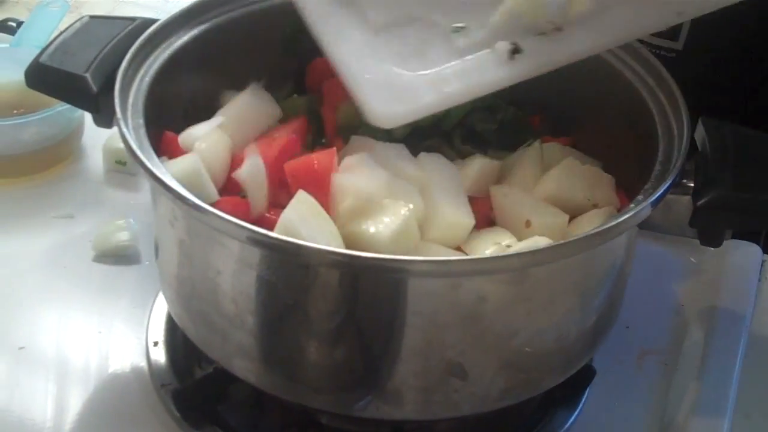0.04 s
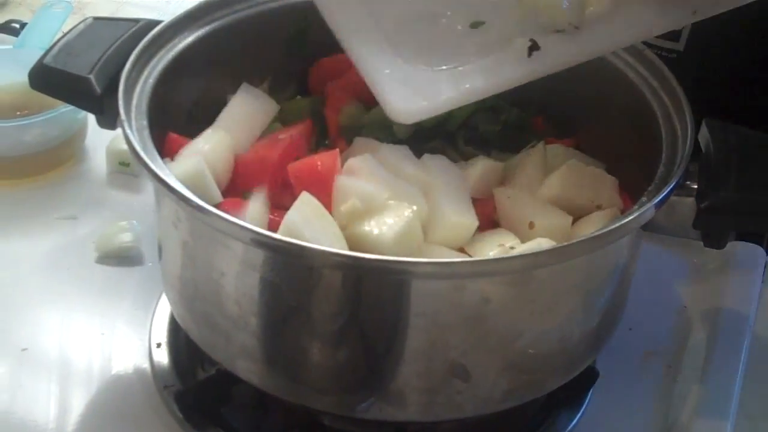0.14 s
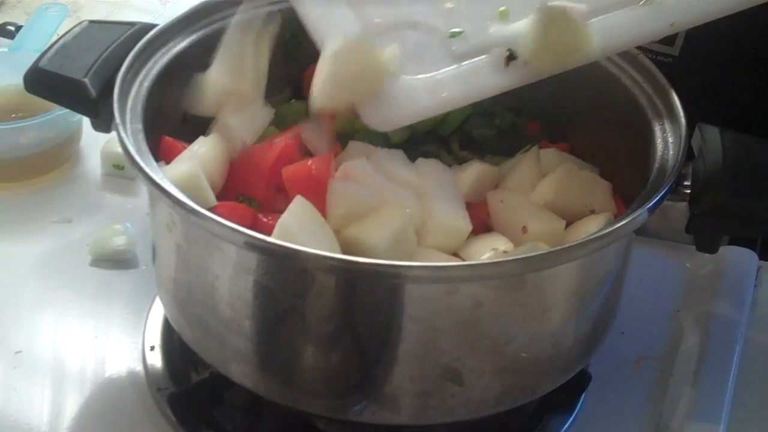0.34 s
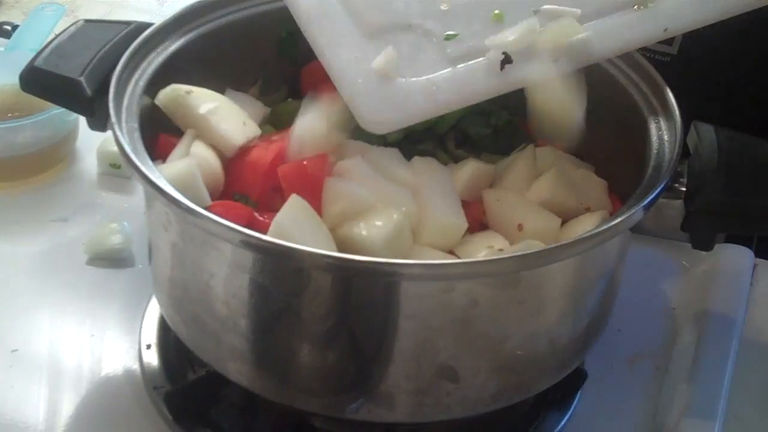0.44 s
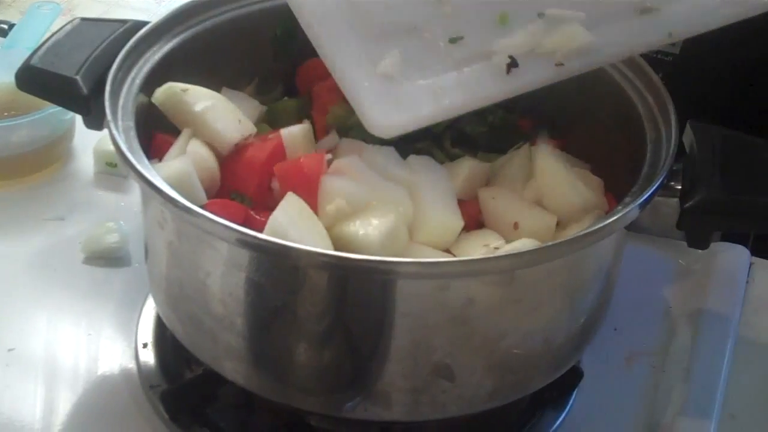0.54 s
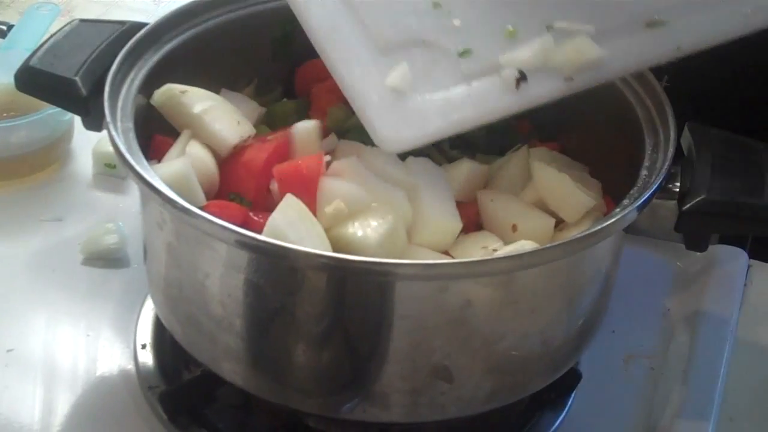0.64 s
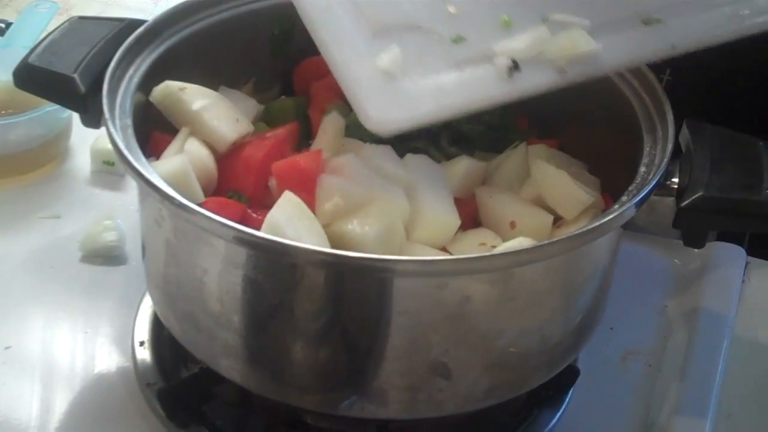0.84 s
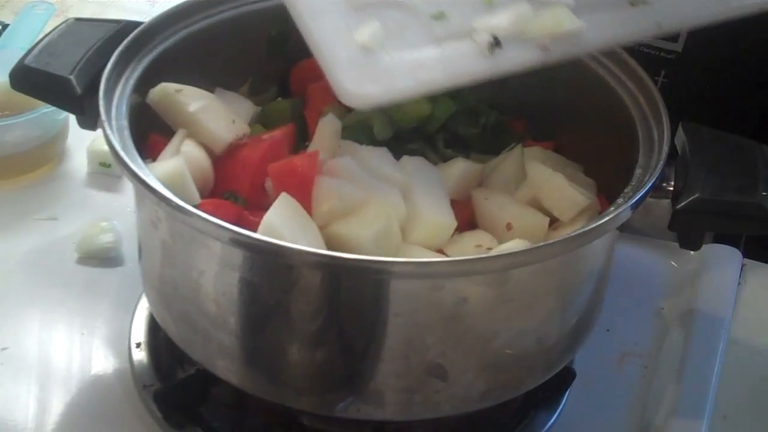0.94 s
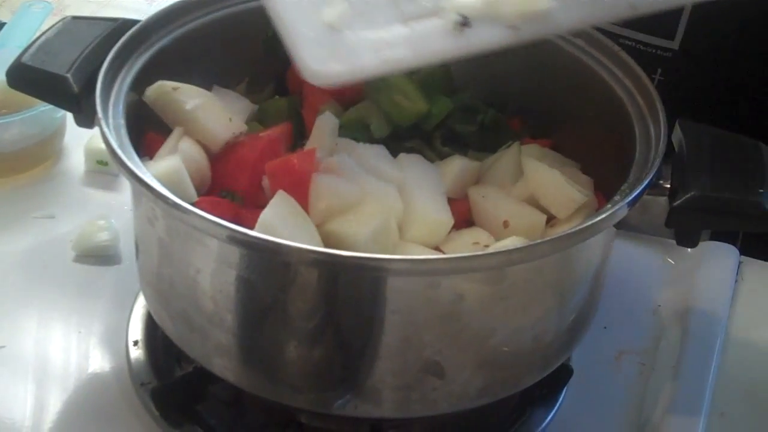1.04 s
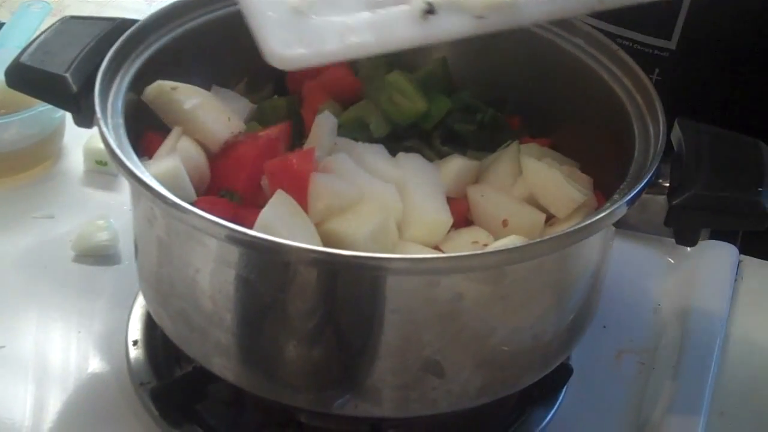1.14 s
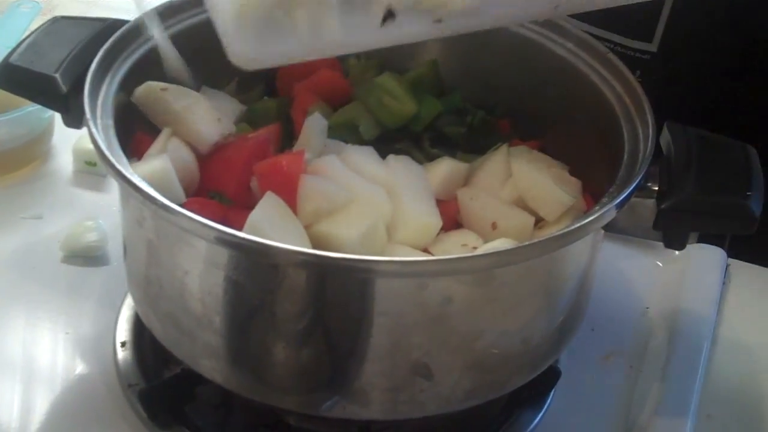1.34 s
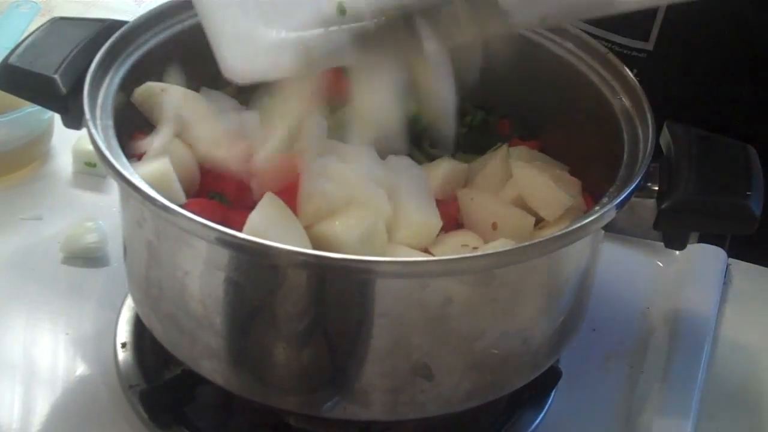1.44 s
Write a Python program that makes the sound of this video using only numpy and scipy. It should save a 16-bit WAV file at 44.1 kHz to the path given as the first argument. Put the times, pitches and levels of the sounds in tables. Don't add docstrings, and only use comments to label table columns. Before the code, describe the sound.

Two knocks of a steel knife on a plastic cutting board, heard close in a small, dull kitchen. Faint pot sizzle and light ticks come first; at 0.24 s a loud snap and clack with thin blade ring, chattering until about 0.35. Near quiet follows. At 0.91 a second, drier knock leads into a gritty, softly ringing metal scrape from 0.97, with small catches, fading by 1.5.

```python
import sys
import numpy as np
from scipy import signal
from scipy.io import wavfile
from scipy.ndimage import uniform_filter1d

SR = 44100
rng = np.random.default_rng(int(sys.argv[2]) if len(sys.argv) > 2 else 0)


def invert_db(x):
    u = np.asarray(x, float) / 20
    return 10 ** u


def master_out(mix):
    frames = np.transpose(np.atleast_2d(mix))
    ceiling = np.clip(frames, -1, 1)
    pcm = np.round(ceiling * 32767).astype(np.int16)
    wavfile.write(sys.argv[1], SR, pcm)


N = 66150

# f/Hz, density/dB per Hz
SIZZLE_COLOUR = [(59, -11), (100, -15.5), (491, -13.5), (545, -1), (698, -18), (1060, -3), (1150, -11.5),
                 (3090, -2.5), (14000, -28.5)]
# f/Hz, width/Hz, level/dB
POT_AIR = [(515, 72, -12), (1041, 12.6, 3.5), (1544, 216, -0.5), (2290, 38, -21), (2930, 135, -3.5)]
# t/s, level/dB
SIZZLE_LEVEL = [
    [(0.0, -52.5), (0.132, -53.5), (0.14, -53)],
    [(0.47, -57.5), (0.592, -57.5), (0.9, -54)],
]
# t/s, puff/dB, f/Hz, ring/dB, ring t60/s
TICKS = [(.040, -37.5, 673, -48, 0.066), (0.04, -59, 3100, -38.5, 0.0073), (.161, -58, 3604, -48.5, 0.25),
         (0.1616, -40.5, 1060, -63, 0.02), (.162, -46, 2210, -46, .03), (0.1615, -45.5, 7400, -60, .02),
         (.1615, -50, 13300, -57, 0.04), (.163, -62, 10700, -61, .06), (.188, -49, 6000, -60, .02),
         (.188, -62, 13100, -64, 0.092), (.19, -45, 2220, -55, .03), (.219, -70, 10900, -71, 0.035),
         (.188, -57, 10700, -55.5, 0.054), (.243, -17, 1450, -33, 0.05), (0.275, -28, 1350, -50, 0.02),
         (0.2388, -18, 4400, -41, .04), (.276, -53, 10700, -42, 0.073), (.287, -31, 6430, -40, .03),
         (0.289, -36, 1300, -51, .05), (.298, -33, 1943, -37, 0.058), (0.268, -32, 2816, -23, 0.054),
         (.272, -40, 6330, -30.5, 0.084), (.292, -35, 4460, -36.5, 0.25), (.293, -36, 3620, -46, 0.28),
         (0.322, -46, 4680, -37.5, 0.075), (.33, -60, 11840, -52.5, 0.1), (.332, -61, 7290, -50, 0.18),
         (0.459, -46, 5240, -77, 0.024), (0.638, -54.5, 7200, -88, 0.022)]
# t/s, puff/dB, f/Hz, ring/dB, ring t60/s
CATCHES = [(.985, -39, 5000, -50, .03), (.985, -48, 2188, -32.5, .05), (1.033, -55, 2203, -41, 0.046),
           (1.048, -60, 8250, -41, 0.062), (1.05, -45, 4960, -44, .03), (1.05, -60, 2160, -40, 0.062),
           (1.105, -55, 4710, -35, 0.036), (1.112, -60, 8420, -40, 0.054), (1.12, -55, 6250, -40, 0.044),
           (1.158, -53, 2179, -37.5, 0.048), (1.284, -50, 4140, -42.5, 0.045), (1.407, -39, 4460, -54, .03),
           (1.084, -49, 4086, -33, 0.046), (1.092, -60, 2268, -36, 0.055), (1.136, -46, 4620, -40, 0.13),
           (1.246, -60, 8430, -41, 0.089), (1.305, -41, 2204, -35, 0.077), (1.315, -39, 2800, -38, 0.044),
           (1.312, -46, 1246, -45, 0.1), (1.349, -67, 2116, -46, 0.043), (1.387, -69, 1262, -44, 0.057),
           (1.4205, -39, 4720, -35, 0.071), (1.4194, -60, 4460, -38, 0.082),
           (1.4188, -62, 4065, -38.5, 0.072), (1.419, -42, 2600, -48, .02), (1.42, -54, 6640, -39.5, 0.072),
           (1.423, -44, 4600, -62, 0.024), (1.441, -62, 8170, -46, 0.1), (1.42, -46.5, 8320, -40.5, 0.048),
           (1.477, -68, 2270, -72, 0.033), (1.242, -66, 2206, -43, 0.13)]
# t/s, level/dB, f/Hz, length/s
THUDS = [
    (.06, -63.5, 278, 0.06),
    (.145, -59.5, 296, 0.018),
    (.158, -64, 171, 0.021),
]
# t/s, level/dB
SLIDE_LEVEL = [
    (.14, -62.5),
    (.17, -57.5),
    (.23, -60.5),
    (.24, -28),
    (.27, -47),
    (.31, -34.5),
    (.35, -57),
    (.40, -62),
    (.46, -63),
]
# f/Hz, density/dB per Hz
SLIDE_COLOUR = [(100, -115), (330, -59), (550, -4.5), (1250, -4), (2500, -15), (6500, -4.5), (9300, -18.5),
                (14000, -41)]
# f/Hz, t60/s, level/dB
CHATTER = [(1450, 0.054, -6), (1925, 0.055, -4.5), (2820, 0.038, -6), (541, 0.077, -2), (4460, .07, -9),
           (4950, 0.034, -3.5), (5700, 0.036, -7), (6310, 0.044, -15), (6790, 0.057, -6.5),
           (7970, 0.057, -13), (9650, .015, -13), (10700, 0.032, -15), (12100, .02, -12),
           (13100, 0.013, -10)]
# t/s, blade/dB, board/dB, crack/dB, crack t60/s
KNOCKS = [
    (.2358, -20, -21, -14, .045),
    (.9126, -20, -20, -16, .022),
]
# snap/dB, snap f/Hz, push/dB, push length/s
CONTACT = [
    (-3.5, 2260, -36.5, 0.0085),
    (-13, 4930, -40, 0.0019),
]
# f/Hz, density/dB per Hz
CRACK_COLOURS = [
    [(100, -44), (450, -19.5), (1850, -17.5), (2230, -8), (3070, -25.5), (5190, -14.5), (10800, -36),
     (14200, -36.5)],
    [(60, -65), (500, -11), (900, 1), (2000, -9.5), (5000, -16), (9000, -20.5), (16000, -39)],
]
# f/Hz, t60/s, knock 1/dB, knock 2/dB
BOARD = [(150, .05, -14, -44), (600, .1, -6, -14), (850, .03, -9, -4), (1040, .03, -10, -14),
         (1440, .035, -14, -14), (1600, .06, -14, -7), (1925, .04, -12, -18), (2306, .03, -3, -12),
         (5190, .035, 2, -3), (7850, .04, -8, -24), (9950, .03, -24, -30), (11880, .05, -16, -44),
         (13100, .05, -12, -44)]
# f/Hz, t60/s, knock 1/dB, knock 2/dB
BLADE = [(538, .3, -22, -18), (1256, .27, -6, -1), (2178, .12, 0, 0), (2810, .15, -2, -15),
         (3620, .33, -15, -17.5), (4083, .09, 1, -18), (4460, .19, -5, -8), (4713, .22, -11, -11),
         (6305, .2, -13, -27), (6715, .2, -30, -28), (7290, .13, -18, -7), (8315, .14, -7, -26),
         (10700, .09, -7, -42), (11330, .06, -40, -13)]
# t/s, level/dB
SCRAPE_LEVEL = [
    (.93, -66),
    (.975, -46),
    (.99, -44.5),
    (1.1, -41),
    (1.19, -49),
    (1.26, -47.5),
    (1.33, -42),
    (1.40, -52),
    (1.5, -54),
]
# f/Hz, density/dB per Hz
SCRAPE_COLOUR = [(100, -50), (330, -9.5), (570, 1), (2200, -14), (5000, 0), (8500, -3), (11000, -7),
                 (14000, -8.5)]
# f/Hz, t60/s, level/dB
SING = [(1252, .1, -11), (2150, .05, -6), (2205, .04, -5), (2300, .035, -7), (2820, .05, -9),
        (4075, .045, -4), (4455, .08, -9), (4700, .04, -5), (6280, .045, -9), (6690, .045, -10),
        (7300, .07, -12), (7840, .06, -12), (8300, .03, -6), (9960, .05, -17),
        (5500, .012, -10), (8900, .012, -13), (9500, .015, -16), (10500, .015, -15), (11800, .012, -15),
        (13250, .012, -15)]
# t/s, offset/thousandths of full scale
SAG = [
    (.234, -.2),
    (.25, -6),
    (.32, -2.6),
    (.4, -1.4),
    (.61, -.7),
    (.77, 2.1),
    (.91, .2),
    (.93, -1.1),
    (1.27, -.3),
]

RUMBLE_DB, RUMBLE_HZ = -75.5, 25
PUFF_T60_S, PUFF_SKIRT_DB = .012, -26
RISE_S, LOW_CUT_HZ = .0015, 30
SING_DB, HISS_DB, WAVER_DB = -2.5, -4.5, 3.5
ROOM_T60_S, ROOM_DB, ROOM_HZ = 0.27, -12.5, 5350
BAND_HZ, LEAK_GAIN = 13850, .07


def evened(x):
    return x / np.sqrt(np.mean(x ** 2) + 1e-20)


def add(mix, start_s, sound):
    part = mix[round(start_s * SR):][:len(sound)]
    part += sound[:len(part)]


def colour(x, points):
    hz, db = np.transpose(points)
    f = abs(np.fft.fftfreq(4096, 1 / SR))
    log_gain = np.interp(np.log(f + 1), np.log(hz + 1), db) * np.log(10) / 20
    spectrum = np.exp(np.conj(signal.hilbert(log_gain)))
    taps = np.fft.ifft(spectrum).real[:2048]
    return signal.oaconvolve(x, taps / np.linalg.norm(taps))[:len(x)]


def level(points):
    return invert_db(np.interp(np.arange(N) / SR, *np.transpose(points)))


def wander(db, size):
    return invert_db(db * evened(uniform_filter1d(rng.standard_normal(N), size)))


def slips(per_s, spread_db):
    size = invert_db(spread_db * np.minimum(rng.exponential(1, N), 4))
    happens = rng.random(N) < per_s / SR
    return evened(size * rng.standard_normal(N) * happens)


def ring(modes, column):
    t = np.arange(SR // 2) / SR
    m = np.array(modes).T[:, :, None]
    decay = invert_db(m[column] - 60 * t / m[1])
    partials = decay * np.sin(2 * np.pi * m[0] * t)
    return partials.sum(0) * np.minimum(t / RISE_S, 1)


def rung(drive, modes):
    out = np.zeros(N)
    for mode in modes:
        gripped = drive * wander(WAVER_DB, size=900)
        out += signal.oaconvolve(gripped, ring([mode], column=2))[:N]
    return out / np.linalg.norm(ring(modes, column=2))


def sizzle():
    fizz = colour(.9 * rng.standard_normal(N) + .35 * slips(2500, 3.0), SIZZLE_COLOUR)
    t = np.arange(2000) / SR
    air = np.zeros(len(t))
    for hz, width_hz, db in POT_AIR:
        air += invert_db(db) * width_hz * np.exp(-np.pi * width_hz * t) * np.cos(2 * np.pi * hz * t)
    fizz = fizz + invert_db(-2.5) * evened(signal.oaconvolve(rng.standard_normal(N), air)[:N])
    swell = wander(1.0, size=3000)
    rumble = signal.lfilter(*signal.butter(2, RUMBLE_HZ, fs=SR), rng.standard_normal(N))
    lumps = wander(1.3, size=5000)
    points = [row for part in SIZZLE_LEVEL for row in part]
    return evened(fizz) * level(points) * swell + invert_db(RUMBLE_DB) * evened(rumble) * lumps


def ticks():
    out, t = np.zeros(N), np.arange(12000) / SR
    for s, puff_db, hz, ring_db, ring_t60_s in TICKS + CATCHES:
        puff = rng.standard_normal(len(t)) * invert_db(puff_db - 60 * t / PUFF_T60_S)
        skirt = [(hz / 9, 2 * PUFF_SKIRT_DB), (hz / 3, PUFF_SKIRT_DB), (hz / 1.5, -5),
                 (hz, 0), (hz * 1.4, -5), (hz * 2.5, PUFF_SKIRT_DB)]
        add(out, s, colour(puff, skirt))
        decay = invert_db(ring_db - 60 * t / ring_t60_s) * np.minimum(t / RISE_S, 1)
        add(out, s, decay * np.sin(2 * np.pi * hz * t))
    for s, db, hz, length_s in THUDS:
        bump = np.sin(np.pi * np.minimum(t / length_s, 1))
        add(out, s, invert_db(db) * bump * np.sin(2 * np.pi * hz * t))
    return out


def slide():
    drive = slips(6000, 2.5) * level(SLIDE_LEVEL) * wander(1.8, size=150)
    return invert_db(-5) * rung(drive, CHATTER) + invert_db(-3.5) * colour(drive, SLIDE_COLOUR)


def knocks():
    out, t = np.zeros(N), np.arange(4000) / SR
    for k, (s, _, board_db, crack_db, crack_t60_s) in enumerate(KNOCKS):
        snap_db, snap_hz, push_db, push_s = CONTACT[k]
        add(out, s, invert_db(board_db) * ring(BOARD, column=2 + k))
        crack = rng.standard_normal(len(t)) * invert_db(crack_db - 60 * t / crack_t60_s)
        add(out, s, colour(crack, CRACK_COLOURS[k]))
        cycles = snap_hz * t
        snap = (0.42 + 1.27 * cycles) * np.sin(2 * np.pi * np.clip(cycles, -1, 1))
        add(out, s, -invert_db(snap_db) * snap)
        add(out, s, invert_db(push_db) * np.sin(np.pi * np.minimum(t / push_s, 1)) ** 2)
    return out


def blade():
    out = np.zeros(N)
    for k, (s, blade_db, *_) in enumerate(KNOCKS):
        add(out, s, invert_db(blade_db) * ring(BLADE, column=2 + k))
    return out


def scrape():
    drive = slips(10000, 2.0) * level(SCRAPE_LEVEL) * wander(1.6, size=700)
    return invert_db(SING_DB) * rung(drive, SING) + invert_db(HISS_DB) * colour(drive, SCRAPE_COLOUR)


def room(x):
    t = np.arange(SR // 2) / SR
    tail = rng.standard_normal(len(t)) * invert_db(-60 * t / ROOM_T60_S) * (t > .004)
    tail = signal.lfilter(*signal.butter(1, [250, ROOM_HZ], "band", fs=SR), tail)
    return invert_db(ROOM_DB) * signal.oaconvolve(x, tail / np.linalg.norm(tail))[:N]


def scene():
    near = ticks() + slide() + knocks() + scrape()
    near = signal.lfilter(*signal.butter(2, LOW_CUT_HZ, "high", fs=SR), near)
    return (near + room(near) + blade() + sizzle())[None]


def top_cut(x):
    return signal.sosfilt(signal.butter(12, 14340, fs=SR, output="sos"), x)


def record(dry):
    taps = signal.firwin(511, BAND_HZ, fs=SR)[None]
    sag = np.interp(np.arange(N) / SR, *np.transpose(SAG)) / 1000
    sag = uniform_filter1d(sag, size=600)
    mix = signal.oaconvolve(dry, taps, "same") + LEAK_GAIN * dry + sag
    return top_cut(mix)


dry = scene()
out = record(dry)
master_out(out)
```